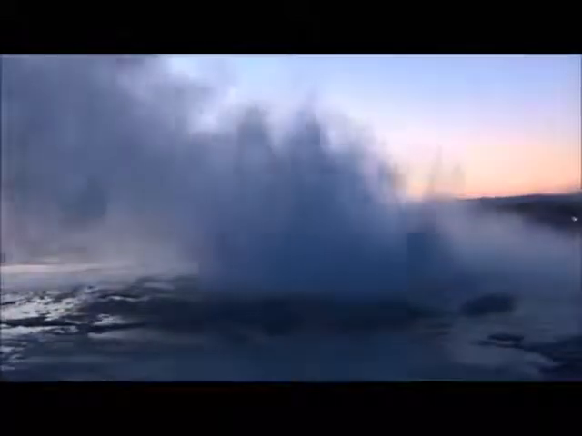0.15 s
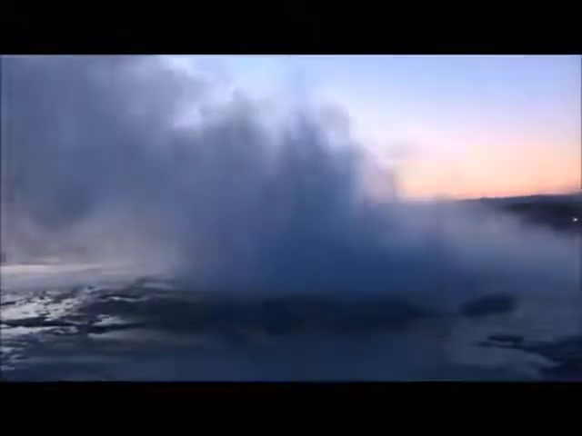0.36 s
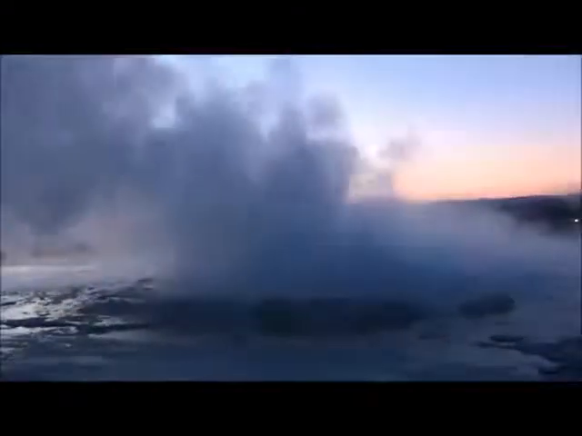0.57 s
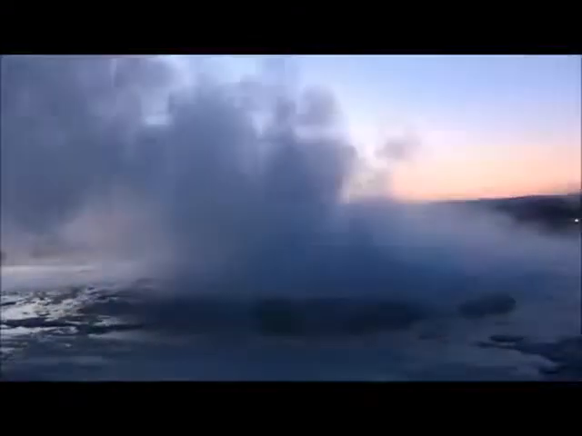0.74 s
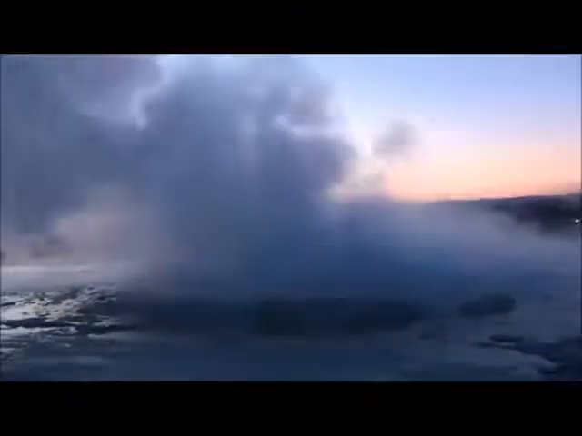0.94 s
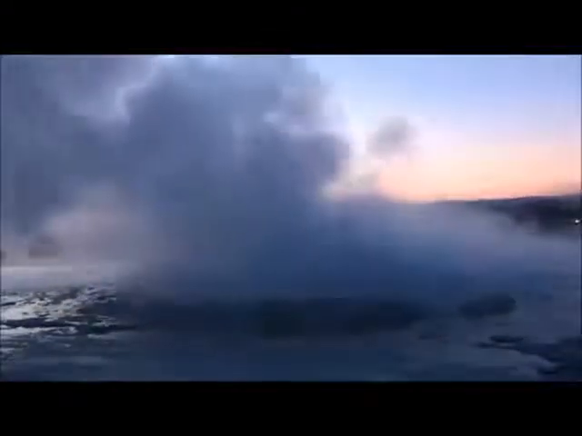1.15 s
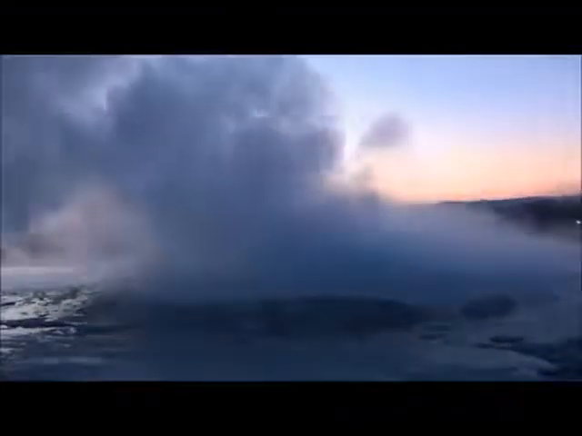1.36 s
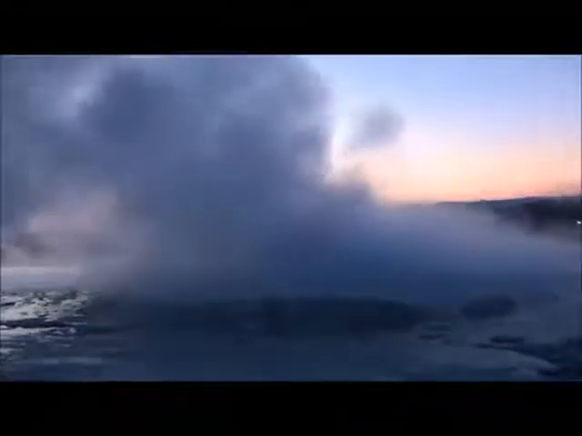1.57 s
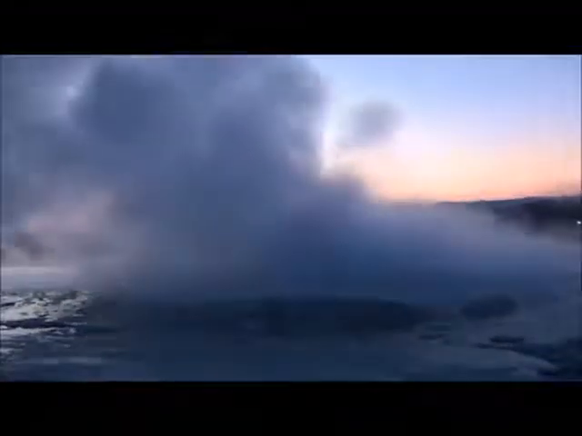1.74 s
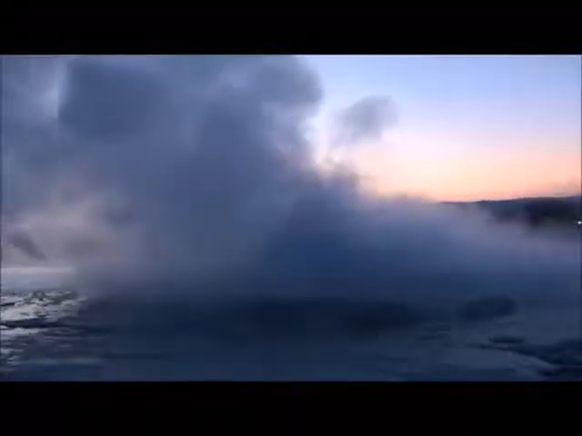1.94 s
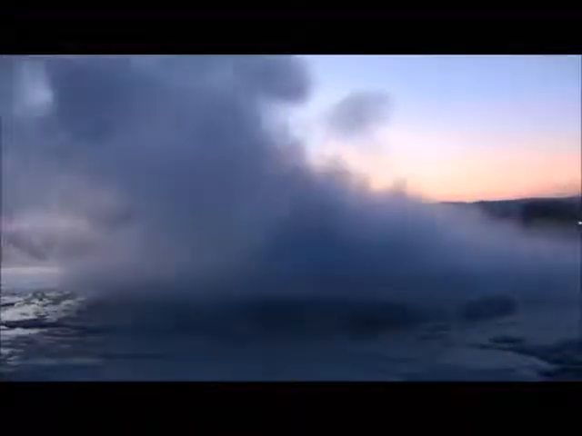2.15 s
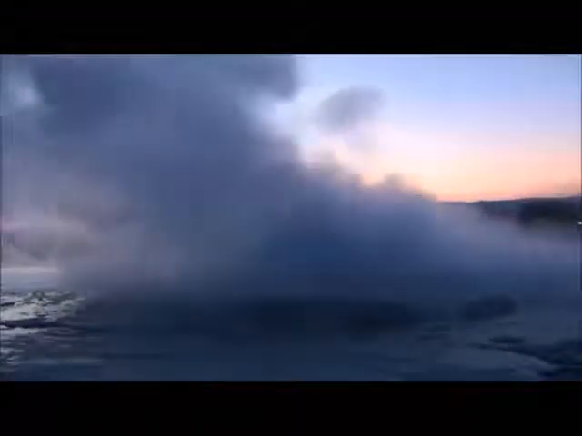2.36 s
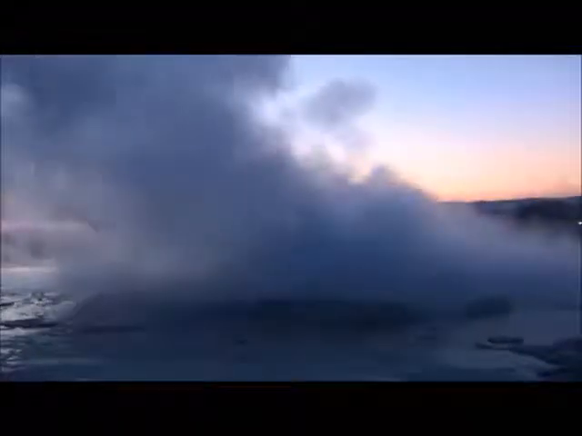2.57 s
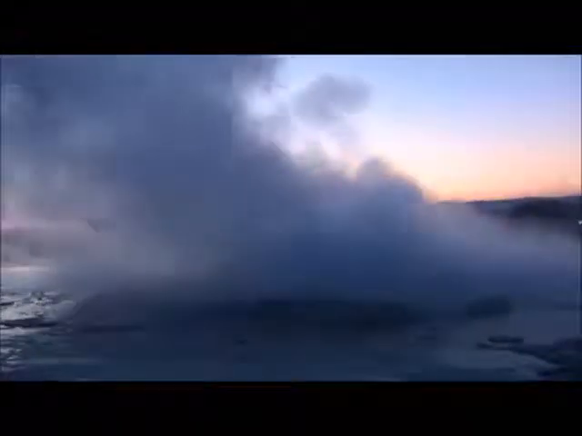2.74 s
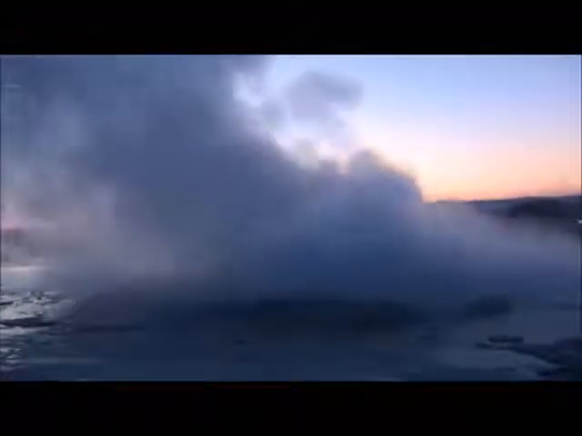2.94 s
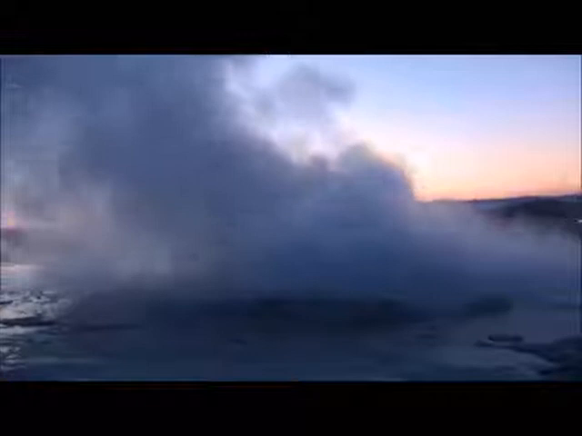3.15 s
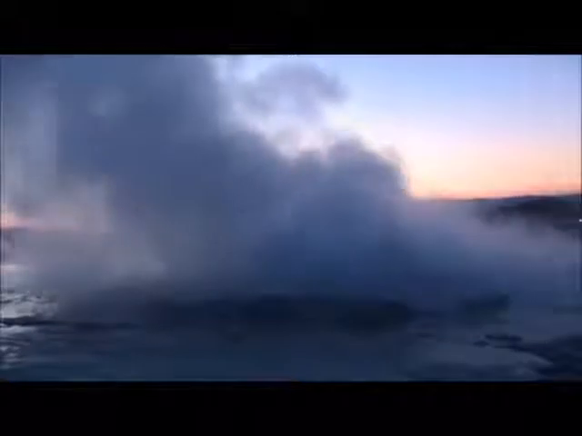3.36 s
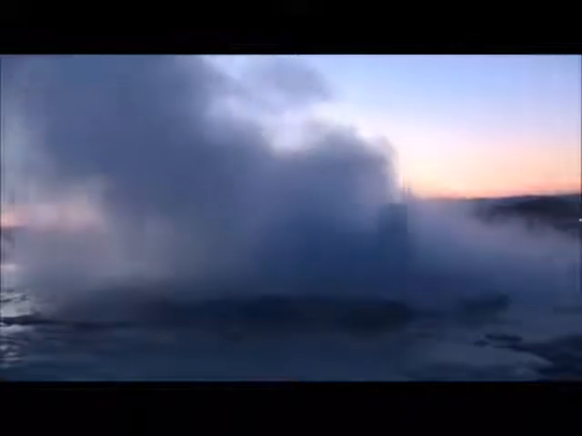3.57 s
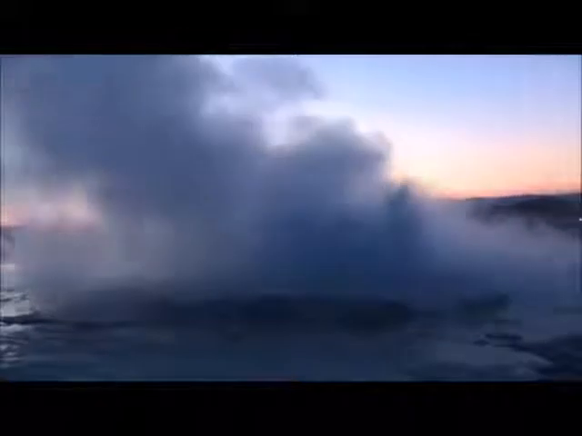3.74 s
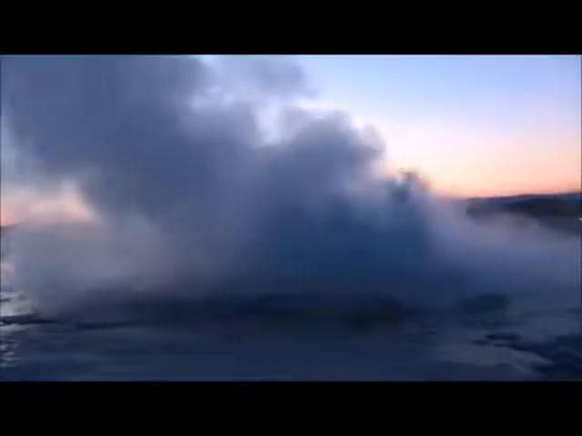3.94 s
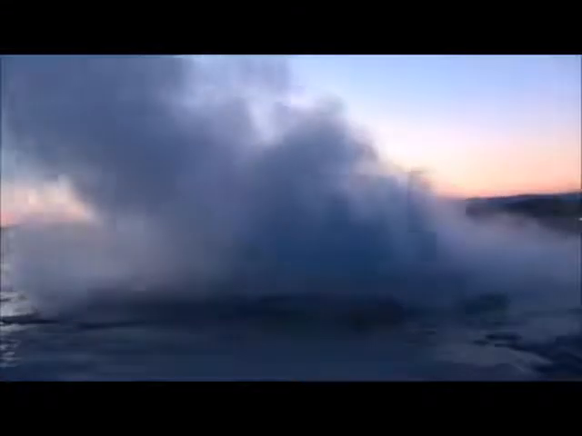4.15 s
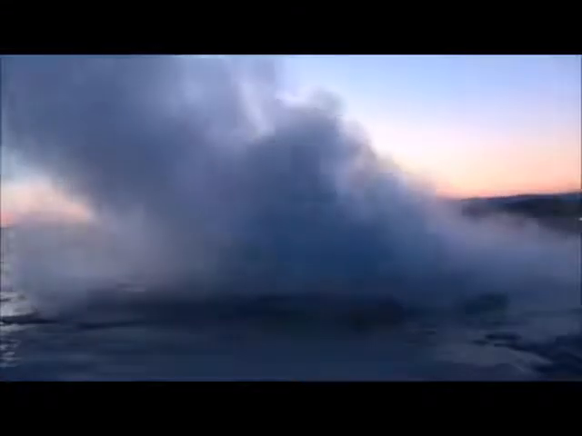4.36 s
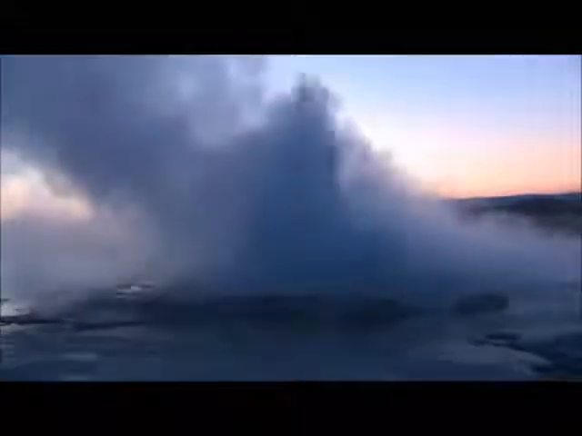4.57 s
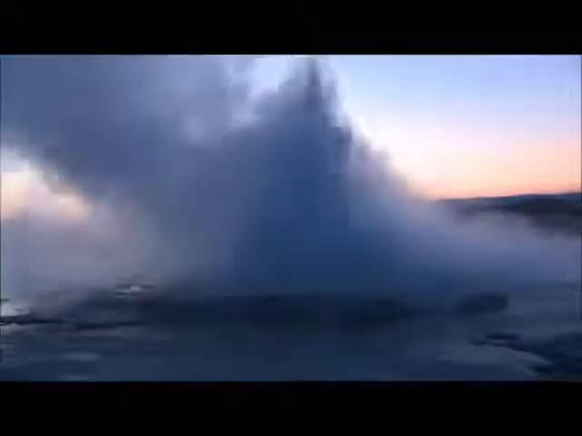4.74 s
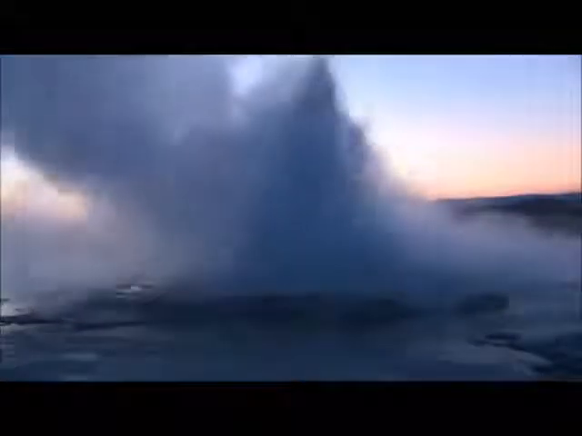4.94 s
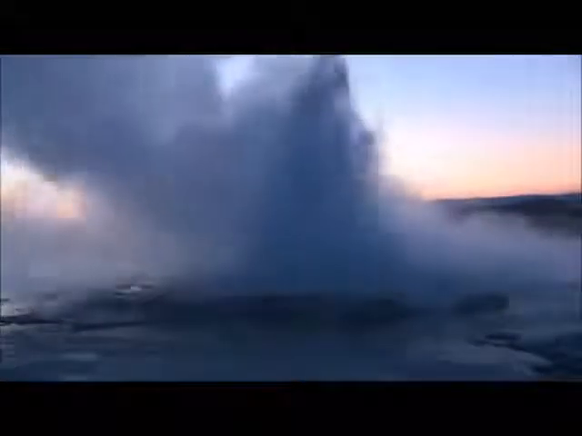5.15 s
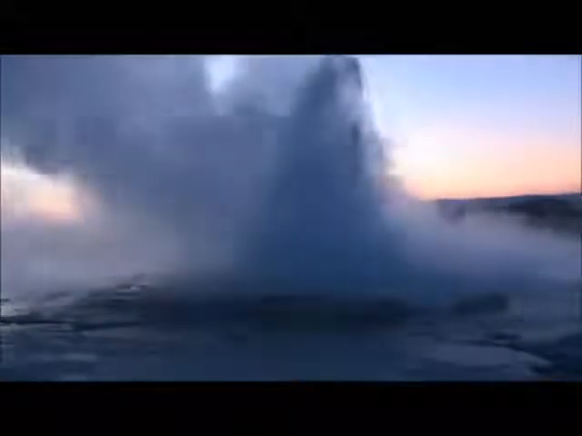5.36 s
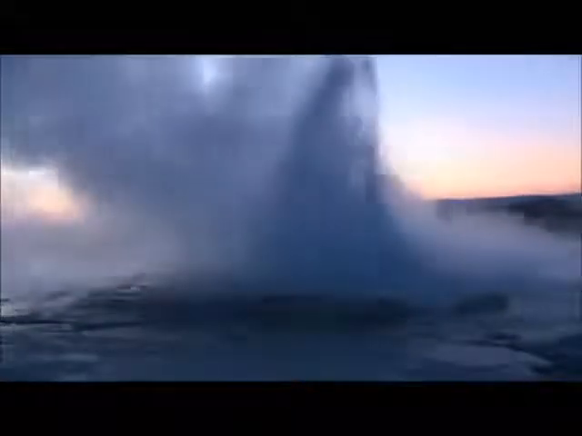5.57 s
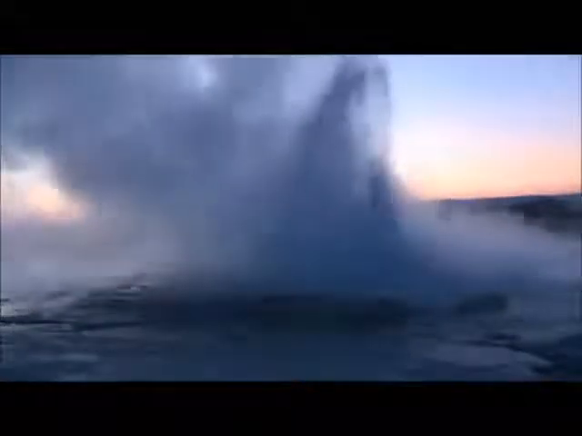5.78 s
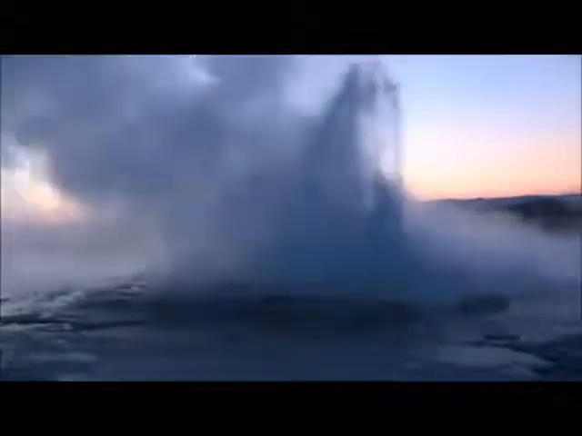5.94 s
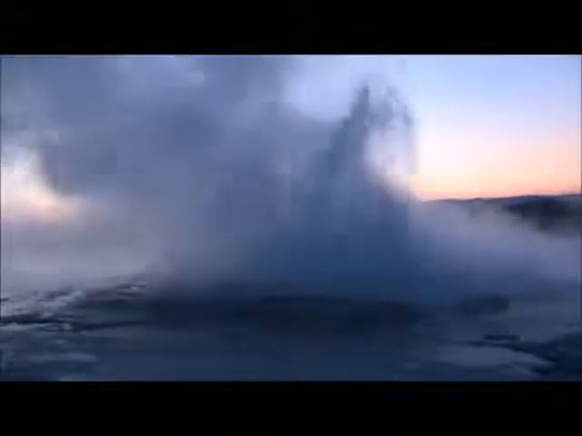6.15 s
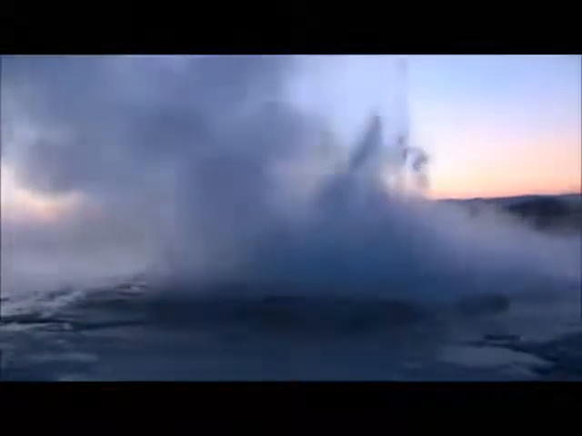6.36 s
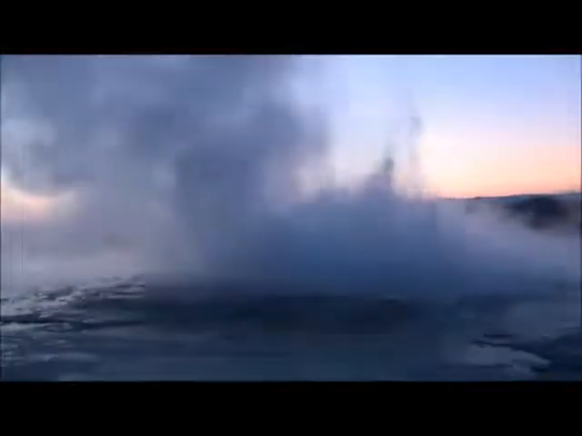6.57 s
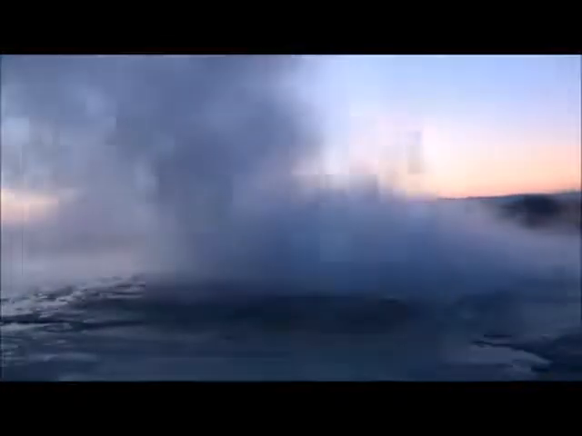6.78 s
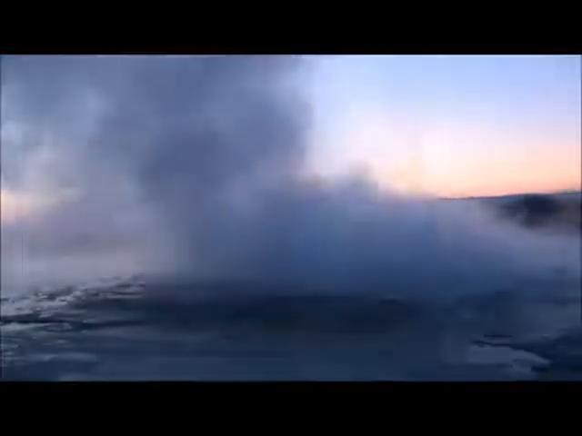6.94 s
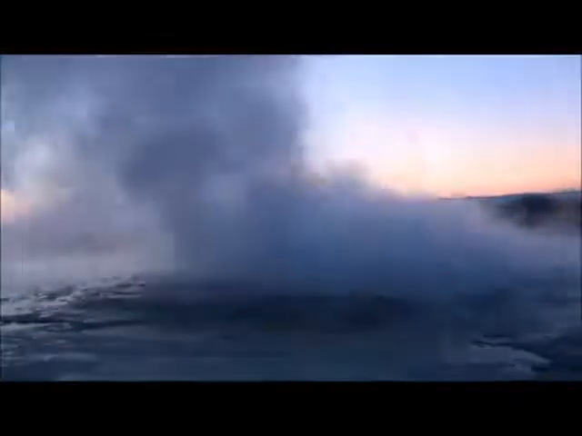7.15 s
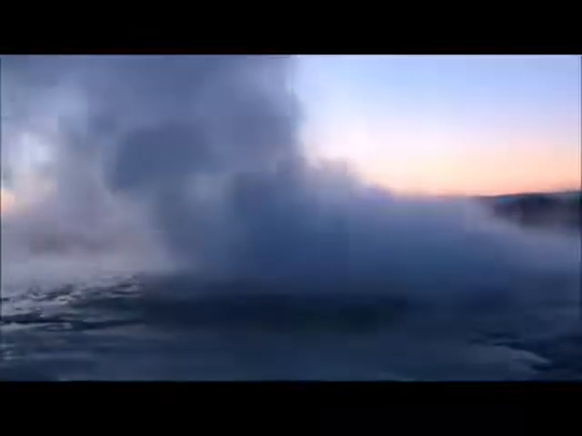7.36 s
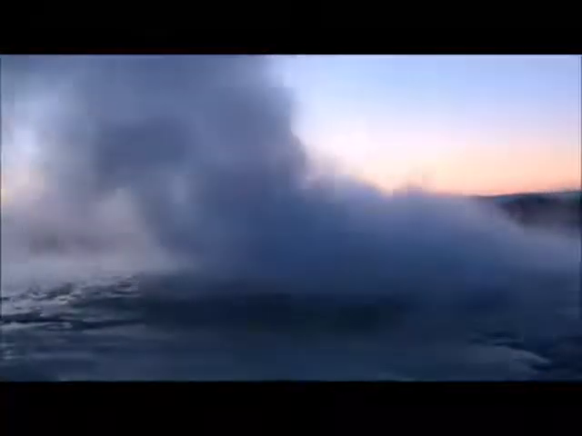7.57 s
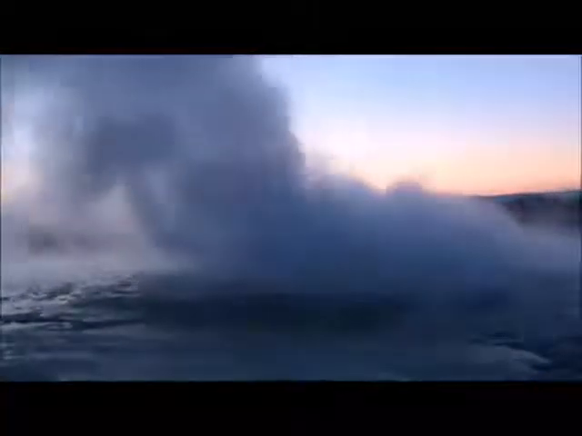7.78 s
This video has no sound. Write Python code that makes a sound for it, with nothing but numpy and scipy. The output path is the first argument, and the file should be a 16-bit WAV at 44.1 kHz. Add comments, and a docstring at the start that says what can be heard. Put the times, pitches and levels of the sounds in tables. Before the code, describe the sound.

Dense splashing and the hiss of spray ride on the rumbling roar of a distant geyser, heard outdoors through a single microphone. It starts loud, then sinks into a lull as a few tiny drops land close by. After a small swell, the eruption gathers strength again, pulsing unevenly as heavy masses of water plunge back into the pool.

```python
"""Water crashes onto a pool over the roar of a vent: a distant geyser surges twice in the open.
Turbulence gives the roar and a low rumble. Falling water and hissing spray are noise mixed with
dense random impacts, and each brightens as it rises above the layer below it in pitch.
A few drops tick nearby, and in the second surge a mass of water plunges in with a sinking tone.
One microphone hears it all."""
import sys
import numpy as np
from scipy import signal
from scipy.fft import rfft, irfft, next_fast_len
from scipy.io import wavfile
from scipy.ndimage import uniform_filter1d

SR = 44100
rng = np.random.default_rng(int(sys.argv[2]) if len(sys.argv) > 2 else 0)


def generate_wav(signal):
    """Clip the signal to [-1, 1] and save it as 16-bit WAV at the path in sys.argv[1]."""
    frames = np.transpose(np.atleast_2d(signal))
    scaled = np.clip(frames, -1, 1) * 32767
    pcm = np.round(scaled).astype(np.int16)
    wavfile.write(sys.argv[1], SR, pcm)


N = 344421
TIME = np.arange(N) / SR


def amp(db):
    """Amplitude ratio of a level in decibels."""
    return 10 ** (np.asarray(db) / 20)


def unit_rms(x):
    """Normalisation to unit mean power."""
    return x / np.sqrt(np.mean(x ** 2) + 1e-20)


def impacts(per_s, spread_db):
    """Shot noise: impulses at random moments, most small and a few large."""
    size = amp(spread_db * np.minimum(rng.exponential(1, N), 3)) * rng.choice([-1, 1], N)
    return unit_rms(size * (rng.random(N) < per_s / SR))


def coloured(x, spectrum, patchy_db, patch_s, patch_hz, tilt_db=0, pivot_hz=1000):
    """Time-varying filtering: a spectral envelope with random patches and a tilt in dB per octave."""
    hz, t, bins = signal.stft(x, SR, nperseg=1024, noverlap=768)
    f, db = np.transpose(spectrum)
    patches = uniform_filter1d(rng.standard_normal(bins.shape), max(1, round(patch_hz / hz[1])), 0)
    patches = unit_rms(uniform_filter1d(patches, max(1, round(patch_s / t[1])), 1))
    shape_db = np.interp(np.log(hz + 1), np.log(f), db)[:, None] + patchy_db * patches
    octaves = np.log2(np.clip(hz, f[0], f[-1]) / pivot_hz)[:, None]
    shape_db += np.interp(t, TIME, tilt_db * np.ones(N)) * octaves
    return unit_rms(signal.istft(bins * amp(shape_db), SR, nperseg=1024, noverlap=768)[1][:N])


def churn(slow_hz, fast_hz):
    """Superposition: slow sines of random phase give the uneven pulsing of the flow."""
    t = np.arange(0, N + 64, 64) / SR
    rates_hz = np.geomspace(slow_hz, fast_hz, 40)
    waves = sum(np.sin(2 * np.pi * (f * t + rng.random())) / np.sqrt(f) for f in rates_hz)
    return np.interp(TIME, t, unit_rms(waves))


# Notches on the path to the microphone: (frequency [Hz], width [Hz], gain [dB])
NOTCHES = [(405, 45, -6), (860, 80, -3), (1280, 90, -3), (2050, 150, -2), (4400, 600, -2.5)]

def sound_path(x):
    """Fixed spectral notches, likely from interference with reflections off ground and pool."""
    size = next_fast_len(N)
    hz = np.fft.rfftfreq(size, 1 / SR)
    cut_db = sum(db * np.exp(-.5 * ((hz - f) / width) ** 2) for f, width, db in NOTCHES)
    return irfft(rfft(x, size) * amp(cut_db), size)[:N]


# Drops landing nearby: (time [s], level [dB], frequency [Hz], decay time [s])
NEAR_DROPS = [(1.129, -9, 3000, .0002), (1.215, -16, 9500, .0003), (1.2317, -11, 6000, .00008),
              (1.438, -16.5, 2100, 0.00084), (1.7124, -25, 7500, .0004), (1.7138, -18, 11500, .00015),
              (1.730, -19, 2600, 0.00044), (1.7301, -21, 5000, .0005), (5.853, -10, 2120, 0.0011)]

def near_drops():
    """Damped oscillation: each drop rings for a few cycles."""
    out, t = np.zeros(N), np.arange(400) / SR
    for start, db, hz, decay in NEAR_DROPS:
        ring = np.sin(2 * np.pi * hz * t) * np.exp(-t / max(decay, 1e-4))
        out[round(start * SR):][:400] += amp(db) * ring
    return out


def plunge(start_s=6.3, length_s=.23, level_db=-29.5, from_hz=1300, to_hz=329, width_hz=260):
    """Cavity resonance: a band of noise sinks in pitch as plunging water opens a hollow in the pool."""
    progress = np.clip((TIME - start_s) / length_s, 0, 1)
    hz = from_hz * (to_hz / from_hz) ** progress
    pole = np.exp(-np.pi * width_hz / SR)
    noise = rng.standard_normal(N) + 1j * rng.standard_normal(N)
    band = signal.lfilter([1], [1, -2 * pole, pole * pole], noise)
    tone = (band * np.exp(2j * np.pi * np.cumsum(hz) / SR)).real
    envelope = np.minimum(np.minimum(progress, 1 - progress) / .15, 1)  # rise and fall take 15% each
    return amp(level_db) * envelope * unit_rms(tone)


# Spectrum of the rumble: (frequency [Hz], spectral level [dB])
RUMBLE_SPECTRUM = [(20, -40), (35, -44), (55, -31), (100, -11.5), (170, -4), (270, -2), (340, -1.5),
                   (450, -15.5), (800, -66)]

def rumble(roar_db, heave_db, follows=.82, offset_db=-12, growth_db_per_s=.2):
    """Low-frequency turbulent noise: it partly follows the roar's level and slowly gains on it."""
    level_db = follows * roar_db + offset_db + growth_db_per_s * (TIME - TIME.mean()) + heave_db
    noise = rng.standard_normal(N)
    return amp(level_db) * coloured(noise, RUMBLE_SPECTRUM, patchy_db=0, patch_s=.063, patch_hz=100)


# Spectrum of the vent: (frequency [Hz], spectral level [dB])
ROAR_SPECTRUM = [(250, -40.5), (400, -7), (480, -5.5), (600, -3.5), (750, -7), (950, -10.5), (1500, -30.5),
                 (3000, -52)]

def vent_roar():
    """Turbulence in the vent radiates a broad band of noise."""
    return coloured(rng.standard_normal(N), ROAR_SPECTRUM, patchy_db=1.23, patch_s=.067, patch_hz=200)


# Spectrum of the spray: (frequency [Hz], spectral level [dB])
SPRAY_SPECTRUM = [(1500, -12), (3000, -4), (4500, -4), (6300, -3), (8000, -5.5), (10500, -8), (12500, -13),
                  (14000, -20.5), (15500, -29)]

def spray(above_water_db):
    """Incoherent summation: fine impacts merge into a hiss, brighter as it rises above the water."""
    patter = rng.standard_normal(N) + .5 * impacts(per_s=3000, spread_db=2.5)
    return coloured(patter, SPRAY_SPECTRUM, patchy_db=1.1, patch_s=.025, patch_hz=400,
                    tilt_db=2 + .44 * above_water_db, pivot_hz=7500)


# Spectrum of water striking the pool: (frequency [Hz], spectral level [dB])
WATER_SPECTRUM = [(300, -59), (700, -6.5), (1050, -1.5), (1600, -1.5), (2100, -3), (2800, -8),
                  (3500, -10.5), (5000, -13.5), (9000, -28)]

def falling_water(above_roar_db):
    """Impact noise: dense slaps on the pool form a crash, brighter as it rises above the roar."""
    slaps = rng.standard_normal(N) + .44 * impacts(per_s=1500, spread_db=3.4)
    return coloured(slaps, WATER_SPECTRUM, patchy_db=.6, patch_s=.03, patch_hz=300,
                    tilt_db=-1.5 + .29 * above_roar_db, pivot_hz=1700)


# Course of the eruption: (time [s], roar level [dB], water level [dB], spray level [dB])
ERUPTION_LEVELS = [(0, -33.5, -29, -30), (.5, -34.5, -29.5, -28.5), (.7, -37.5, -32, -29),
                   (.9, -39.5, -33.5, -32.5), (1.12, -38, -31.5, -30), (1.42, -45, -32.5, -29),
                   (1.75, -44.5, -39, -41), (2.2, -45, -38.5, -45), (2.5, -44, -36.5, -41.5),
                   (2.76, -39.5, -32.5, -35), (3.05, -38, -29.5, -33), (3.55, -38.5, -35, -40),
                   (3.9, -38, -34.5, -40.5), (4.2, -36, -29, -34), (4.55, -32.5, -27, -30),
                   (5.2, -31, -26.5, -30), (5.45, -34, -28, -31), (5.7, -35, -27.5, -29),
                   (6.4, -30, -25, -27), (6.58, -31, -26, -27), (6.72, -31.5, -24, -27.5),
                   (6.83, -32, -26.5, -28.5), (7.05, -31.5, -27, -26.5), (7.2, -33, -27.5, -32),
                   (7.81, -34, -30, -35)]
# Heavy splashes that swell the lower layers: (time [s], swell of the roar [dB], half-length [s])
HEAVY_SPLASHES = [(0.035, 1, .05), (.2, 1, 0.034), (0.523, 1.5, .05), (1.066, 1.5, .05), (1.92, 1, .08),
                  (2.98, 1, 0.058), (3.466, 0.5, .06), (4.468, 2, .04), (4.72, 2, 0.049), (5.0, 3.5, 0.046),
                  (5.232, 2.5, .03), (6.46, 2.5, 0.07), (6.65, 2.5, .03), (6.74, 3, .03),
                  (6.96, 3.5, 0.049), (7.061, 6, 0.025), (7.418, 2.5, 0.13)]

def geyser(opening_s=1.22, opening_boost_db=4.5):
    """Common amplitude modulation: one uneven flow makes roar, water and spray pulse together."""
    times, *levels = np.transpose(ERUPTION_LEVELS)
    roar_db, water_db, spray_db = [np.interp(TIME, times, level) for level in levels]
    swell_db = sum(db * np.exp(-((TIME - at) / half) ** 2) for at, db, half in HEAVY_SPLASHES)
    gusts_db = churn(2.5, 10)
    pulsing = churn(7, 60)
    mix = rumble(roar_db, heave_db=.75 * swell_db + gusts_db)
    mix += vent_roar() * amp(roar_db + swell_db + .61 * pulsing)
    mix += falling_water(water_db - roar_db) * amp(water_db + .5 * swell_db + .26 * pulsing)
    mix += spray(spray_db - water_db) * amp(spray_db + .22 * pulsing)
    return mix * amp(opening_boost_db * (TIME < opening_s))  # a louder opening, then a sudden step down


def scene():
    """Superposition: distant and near sources add at one microphone, which feeds both channels."""
    mono = sound_path(geyser() + plunge()) + near_drops()
    return np.array([mono, mono])


def record(dry):
    """Band limiting: the small microphone loses bass below 60 Hz; a steep low-pass ends the treble."""
    thin = signal.sosfilt(signal.butter(2, 60, "high", fs=SR, output="sos"), dry)
    low_pass = signal.firwin(1023, cutoff=15015, window=("kaiser", 9), fs=SR)
    return signal.oaconvolve(thin, low_pass[None], "same")


dry = scene()
out = record(dry)
generate_wav(out)
```